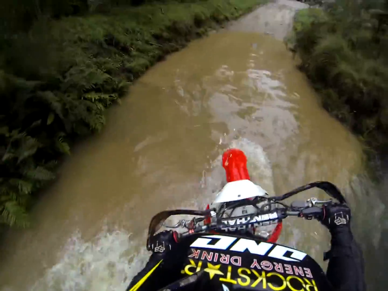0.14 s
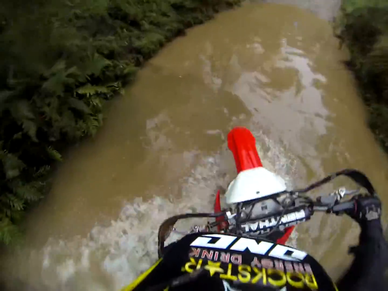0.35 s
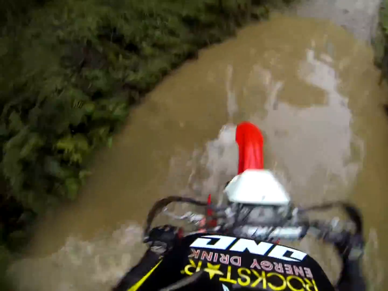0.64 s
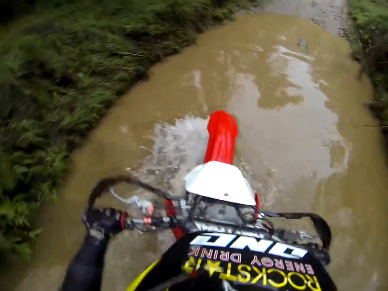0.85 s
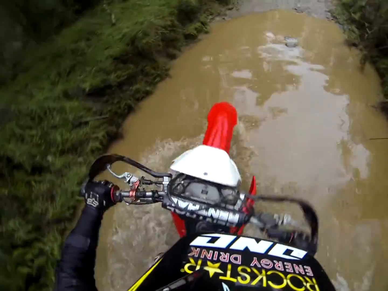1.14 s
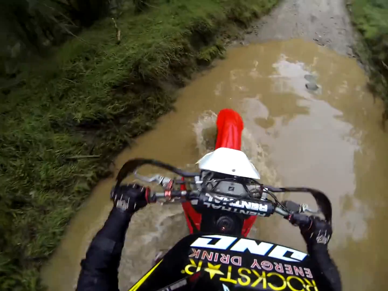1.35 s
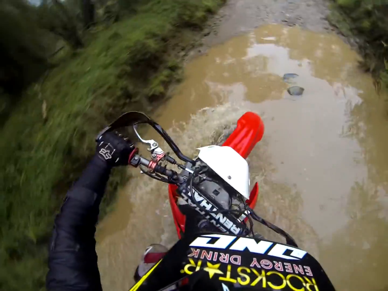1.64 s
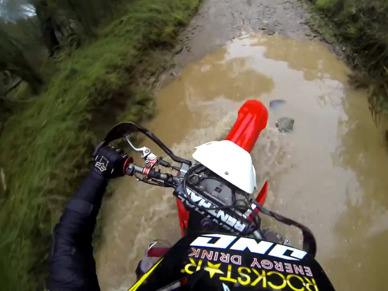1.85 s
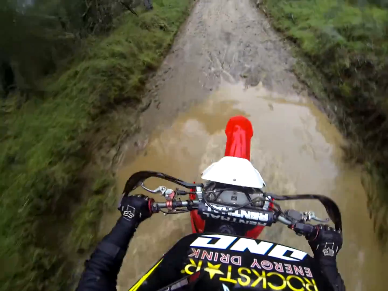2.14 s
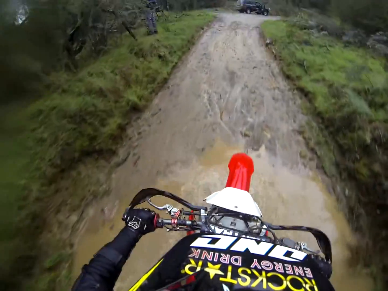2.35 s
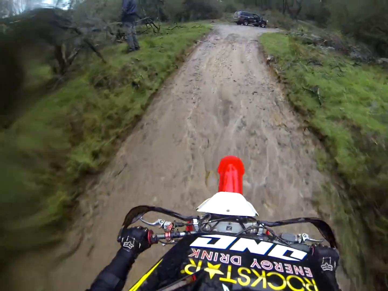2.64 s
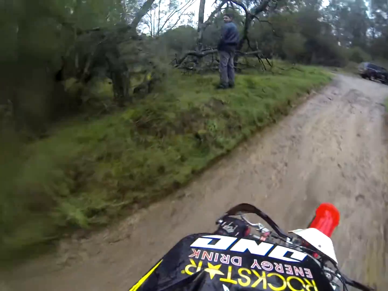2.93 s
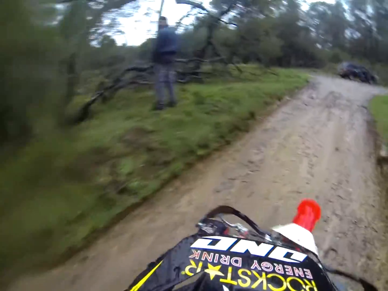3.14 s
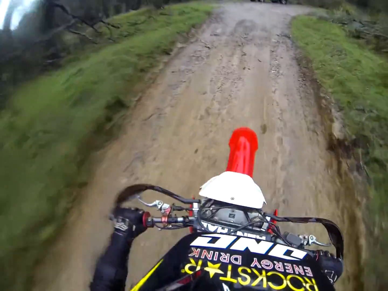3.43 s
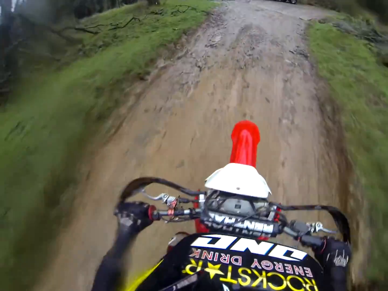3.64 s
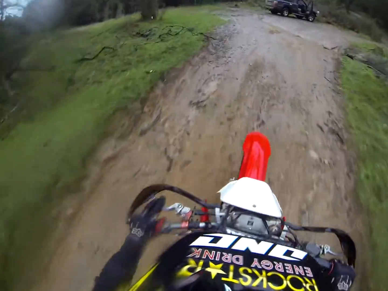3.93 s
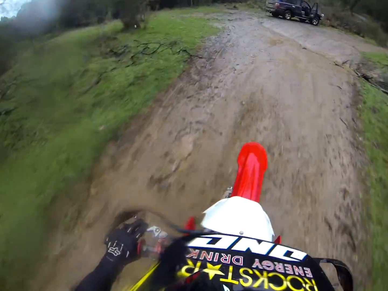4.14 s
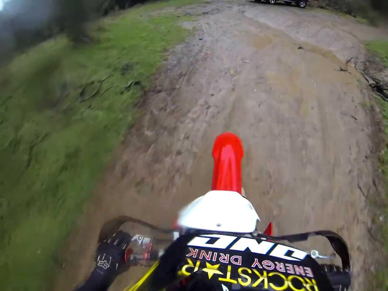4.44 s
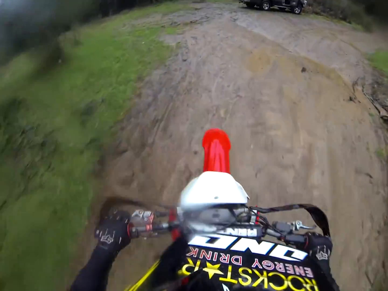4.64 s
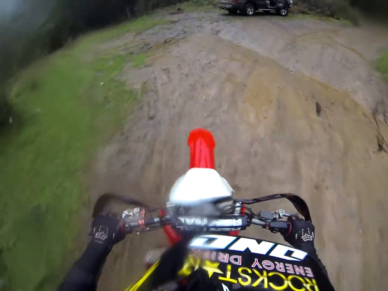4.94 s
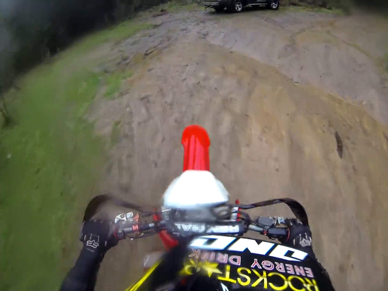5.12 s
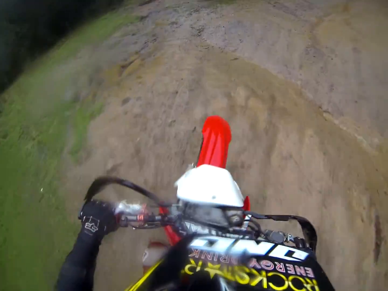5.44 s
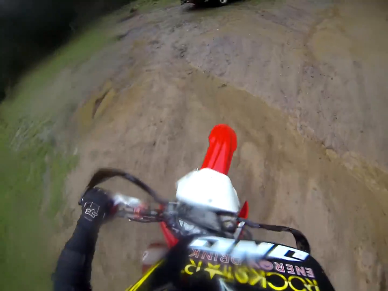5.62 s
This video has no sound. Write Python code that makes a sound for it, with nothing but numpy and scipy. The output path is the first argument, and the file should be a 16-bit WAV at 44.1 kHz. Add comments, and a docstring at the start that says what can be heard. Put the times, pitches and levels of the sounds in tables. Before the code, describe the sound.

A two-stroke dirt bike buzzes in throttle bursts through splashing water, then climbs out and coasts, popping and slowing on a dirt track.

```python
"""A two-stroke trail bike buzzes and splashes through a muddy ford, climbs out and coasts up a dirt track.
Its one cylinder fires in quick pulses that make the exhaust pipe drone, rasping with each burst of
throttle and popping unevenly when it is shut. Water sprays, the chain slaps, grit ticks and wet parts
sing. The microphone rides along in a plastic housing that rings with the engine's clatter.
Wind and thumps set off a very deep, wavering microphone rumble near 20 Hz."""
import sys
import numpy as np
from scipy import signal
from scipy.io import wavfile
from scipy.ndimage import uniform_filter1d

SR = 44100
rng = np.random.default_rng(int(sys.argv[2]) if len(sys.argv) > 2 else 0)


def persist_wave(psi):
    """Save psi, clipped to +-1, as 16-bit WAV."""
    counts = np.round(np.clip(psi, -1, 1) * 32767).astype(np.int16)
    wavfile.write(sys.argv[1], SR, np.atleast_2d(counts).T)


N = 254898
T = np.arange(N) / SR

# Deep water muffles the engine until it leaves the ford. Each row: time in seconds, gain in dB.
WATER_MUFFLING = [(0, -6.5), (.8, -8.5), (1.05, -4.5), (2.0, -1.5), (2.4, 0)]
# How the pipe rings after weak, stray firings. Each row: pitch in Hz, width in Hz, gain in dB.
PIPE_POP_MODES = [(104, 30.5, 10), (178, 34, -0.5), (223.8, 105, 2.5), (329.7, 50, 1), (560, 50, -19.5)]
# The low ringing of the plastic housing. Each row: pitch in Hz, width in Hz, gain in dB.
HOUSING_LOW_MODES = [(930, 660, -15), (1168, 54, -7.5), (1359.5, 182, 3), (1612, 222, 4)]
MUD_TO_DIRT_S = (3.4, 3.8)  # the tyres go from wet mud to gritty dirt between these times


def exhaust(rate, turns, middle_gain_db, high_gain_db):
    """Firings make a stack of tones at multiples of their rate (harmonics), shaped by the pipe."""
    # The ringing of pipe and silencer. Each row: pitch in Hz, width in Hz, gain in dB.
    pipe_modes = [(125.6, 45.7, 12), (235, 38, 8.5), (323, 81, 2.5), (469, 66, 3.5), (545.6, 32, 1),
                  (723.6, 34, -2.5), (945, 14, -17), (1030, 230, -13.5)]
    # The boom at twice the firing rate, strongest in the ford. Each row: time in seconds, level in dB.
    boom_levels = [(0, -36), (.48, -36), (.57, -45), (.72, -37), (.83, -38), (1.0, -20.5), (1.12, -20.7),
                   (1.24, -25.5), (1.57, -26), (1.67, -31.5), (1.8, -28.5), (2.0, -30), (2.23, -43),
                   (2.42, -28), (2.62, -33.5), (2.8, -45.5), (3.15, -30), (3.45, -41), (3.7, -33),
                   (4.05, -49), (4.47, -32), (4.8, -39), (5.78, -35)]
    # Loudness rules for harmonics 3-5 and 6-18; engine_db lists the four numbers.
    middle_rule = (-50.5, 6, 1.0, 1.6)
    high_rule = (-45.5, 17, 0.918, 0.53)
    grid_hz = np.arange(1, 2000)
    response = sum((-1) ** k * from_db(db) / (1 + 1j * (grid_hz ** 2 - hz ** 2) / (grid_hz * width))
                   for k, (hz, width, db) in enumerate(pipe_modes))
    pipe_phase = np.unwrap(np.angle(response))
    lowest, *others = [from_db(db) ** 2 / (1 + (2 * (grid_hz - hz) / width) ** 2)
                       for hz, width, db in pipe_modes]
    pipe_gain = np.sqrt(from_db(-8.5) ** 2 * lowest + sum(others)) ** 1.3  # the power sharpens the peaks
    speed = rate / rate.max()
    smear = speed ** 2  # fast pulses overlap their own echoes, slow ones stay distinct
    waves = []
    for k in range(1, 19):
        phase = 2 * np.pi * k * turns + np.interp(k * rate, grid_hz, pipe_phase)
        wave = np.cos(phase + smear * rng.standard_normal())
        waves.append(wave * np.interp(k * rate, grid_hz, pipe_gain) if k > 2 else wave)
    hum_db = -32.5 + 21 * np.log10(speed) + in_time(WATER_MUFFLING)  # slow pulses carry poorly
    hum = from_db(hum_db) * waves[0]
    boom = from_db(in_time(boom_levels) + 1.89 * drift(22)) * waves[1]
    middle = sum(wave * from_db(2.5 * drift(4.1)) for wave in waves[2:5])
    middle *= from_db(engine_db(middle_rule, rate, middle_gain_db))
    high = sum(wave * from_db(3.5 * drift(7.9)) for wave in waves[5:])
    high = from_db(engine_db(high_rule, rate, high_gain_db)) * evened(high, span_s=0.075)
    unevenness = from_db(1.53 * drift(38))
    return np.sqrt(2) * (hum + boom) + (np.sqrt(2) * middle + high) * unevenness


def rasp(rate, turns, effort_db):
    """Knocks, rushing gas and gear whine swell with each firing and set the housing ringing."""
    # The high ringing of the housing. Each row: pitch in Hz, width in Hz, gain in dB.
    housing_high_modes = [(1870, 85, -8.5), (2072, 218, 5.5), (2439, 185, 1), (2756, 430, -2.5),
                          (3240, 484, -1.5), (3764, 400, -0.5), (4670, 640, -12.5), (5230, 430, -12.5),
                          (5750, 1900, -22.5), (7500, 900, -21.5), (9700, 3160, -32), (13250, 2700, -42)]
    # Brief swells of clatter under load. Each row: time in seconds, gain in dB.
    surges = [(1.07, 6), (1.16, 0), (1.25, -1.5), (1.551, 11), (1.96, 5.5), (2.185, 4), (2.37, 5),
              (2.98, 3.5), (4.12, 3), (4.41, 2)]
    # Loudness rules for the low clatter and high sizzle; engine_db lists the four numbers.
    clatter_rule = (-37, 14, 0.8653, 1.45)
    sizzle_rule = (-43.5, 23.5, 1.0, 1.5)
    surge_db = sum(db * swell(s, half_s=0.038) for s, db in surges)
    clatter_db = engine_db(clatter_rule, rate, effort_db) + surge_db + 1.6 * drift(14.45)
    sizzle_db = engine_db(sizzle_rule, rate, effort_db) + 0.51 * surge_db
    throb = from_db(1.5 * np.cos(2 * np.pi * turns))
    knocks = engine_knocks(turns)
    gas = rng.standard_normal(N)
    gear_phase = 2 * np.pi * 35.5 * turns  # teeth meet 35.5 times a turn, so the whine follows the speed
    whine = from_db(-27 + 3.9 * drift(10)) * np.sin(gear_phase + 1.3 * drift(35))
    clatter = evened(resonate(throb * (knocks + .5 * gas + whine), HOUSING_LOW_MODES), span_s=0.12)
    sizzle = evened(resonate(throb * (knocks + 1.9 * gas + whine), housing_high_modes), span_s=0.083)
    return from_db(clatter_db) * clatter + from_db(sizzle_db) * sizzle


def engine_knocks(turns, per_turn=14, slop_turns=.0035, scatter_db=2.5):
    """Piston, gears and pipe wall knock at the same points of each turn, never quite alike."""
    out, count = np.zeros(N), int(turns[-1]) - 1
    for angle in (np.arange(per_turn) + rng.random(per_turn)) / per_turn:
        at = crank_passes(turns, angle + slop_turns * rng.standard_normal(count))
        out += clicks_at(at, rng.choice([-1, 1]) * from_db(scatter_db * rng.standard_normal(count)))
    return rms_one(out)


def throttle(snap_s=0.058, pick_up_s=0.097):
    """Three gains in dB that rise with each twist; snapping shut makes the engine briefly fall quiet."""
    # Twists of the throttle. Each row: start, time taken to open, start of closing and time taken to
    # close, all in seconds, then gains in dB for the rasp, middle harmonics and high harmonics.
    twists = [(-.03, 0.18, 0.14, .016, 10.5, -1, 7), (.19, 0.27, 0.497, 0.037, 13, 3.5, 11),
              (.58, 0.23, 0.734, 0.067, 12.5, -9, 5), (0.809, 0.17, 1.49, 0.1, 13, 10, 7),
              (1.6, 0.29, 2.148, 0.3, 10.5, 7, 10), (2.21, 0.23, 2.665, .03, 12.5, 11, 10.3),
              (2.8, 0.27, 3.552, 0.33, 7, 3.5, 11.5), (4.25, .15, 4.73, 0.087, 2.5, 6, 6)]
    gains_db, dip_db = np.zeros((3, N)), np.zeros(N)
    for opens, opening_s, shuts, closing_s, *full_db in twists:
        opened = np.sin(np.pi / 2 * np.clip((T - opens) / opening_s, 0, 1))
        closed = np.clip((T - shuts) / closing_s, 0, 1)
        gains_db = np.maximum(gains_db, np.outer(full_db, opened * (1 - closed)))
        dip_db += 7 * closed * np.exp(-closing_s / snap_s - np.maximum(T - shuts, 0) / pick_up_s)
    return gains_db - dip_db


def engine_db(rule, rate, throttle_db):
    """An engine sound grows with speed and throttle and is muffled by deep water."""
    # A rule holds: level in dB at 55 firings a second, dB added at ten times that speed,
    # how much the throttle counts, how much the muffling counts.
    base_db, speed_db, throttle_weight, water_weight = rule
    level_db = base_db + speed_db * np.log10(rate / 55) + throttle_weight * throttle_db
    return level_db + water_weight * in_time(WATER_MUFFLING)


def intake_gulps(fade_s=0.04):
    """As the throttle snaps shut, the air in the intake is stopped short and swings on briefly."""
    # The gulps. Each row: start in seconds, starting level in dB, pitch in Hz.
    gulps = [(0.109, -15.5, 95), (.137, -6.5, 70), (0.427, -16, 89.5), (0.49, -9, 65), (0.516, -13, 55.4),
             (0.729, -11, 60), (.752, -17, 50), (1.6, -15, 45), (2.203, -7, 50), (2.64, -16, 75.95),
             (2.669, -6, 54.52)]
    out = np.zeros(N)
    for s, db, hz in gulps:
        age = np.maximum(T - s, 0)
        out += from_db(db - 60 * np.minimum(age / fade_s, 3)) * np.sin(2 * np.pi * hz * age)
    return out


def burble(turns, scatter_db=0.5, puff_s=0.0085):
    """Each firing is stronger or weaker than the average one and comes with a short puff of gas."""
    # Uneven burning, strongest when coasting. Each row: time in seconds, relative level in dB.
    uneven_levels = [(0, -45), (.44, -51), (.58, -56), (.85, -54), (1.05, -38.5), (2.0, -41), (2.75, -72),
                     (3.4, -36.5), (3.7, -31.5), (4.37, -35), (4.6, -44), (5.05, -36.5), (5.35, -47.5),
                     (5.78, -54)]
    count = int(turns[-1]) - 1
    at = crank_passes(turns, rng.uniform(0, 0.299, count))
    kicks = clicks_at(at, from_db(-scatter_db * rng.standard_normal(count)) * rng.choice([-1, 1], count))
    puffs = signal.lfilter([1], [1, -np.exp(-1 / (puff_s * SR))], kicks) * rng.standard_normal(N)
    ringing = resonate(rms_one(kicks) + 0.47 * rms_one(puffs), PIPE_POP_MODES)
    return from_db(in_time(uneven_levels) - 1.8) * evened(ringing, span_s=0.28)


def exhaust_pops():
    """Stray firings pop in the pipe as the throttle shuts and while the bike coasts."""
    # The pops. Each row: time in seconds, relative peak level in dB.
    pops = [(.122, -32), (.143, -27.5), (.43, -31), (2.0, -22.5), (2.66, -27), (3.66, -30), (3.78, -24),
            (4.874, -39), (4.952, -29), (5.026, -23), (5.074, -27), (5.112, -26), (5.155, -25),
            (5.198, -27), (5.264, -28.5), (5.305, -35), (5.373, -34), (5.435, -33), (5.5, -29), (5.56, -30),
            (5.663, -31), (5.735, -26)]
    return blows(pops, PIPE_POP_MODES, gain_db=-1.5, lead_s=0.00426)


def splashing(effort_db, drops_per_s=4000):
    """Drops patter on the bike in surges and trapped bubbles ring; more throttle makes both louder."""
    # Water pushed aside by the wheels, throttle shut. Each row: time in seconds, relative level in dB.
    splash_levels = [(0, -48.5), (.8, -51), (1.02, -42.5), (2.0, -37), (2.25, -62), (2.75, -58), (3.6, -75),
                     (5.78, -76)]
    # Mudguard and engine cases ringing under the spray. Each row: pitch in Hz, width in Hz, gain in dB.
    spray_modes = [(635, 53, 2.5), (975, 170, -15), (1460, 400, 3.5), (2210, 170, -0.5), (2486, 190, 0),
                   (3720, 580, -5.5), (4750, 490, -16.5), (6960, 4600, -33), (12700, 1100, -39)]
    surge = from_db(4.5 * drift(22))
    sizes = from_db(3 * np.minimum(rng.exponential(1, N), 4)) * rng.choice([-1, 1], N)
    drops = sizes * (rng.random(N) < drops_per_s * surge / SR)
    spray = rms_one(resonate(drops, spray_modes))
    bubble_hz = np.geomspace(380, 2600, num=16)
    choice = rng.integers(0, len(bubble_hz), N)  # each drop gets one bubble pitch
    bubbles = rms_one(sum(band(drops * (choice == k), hz * 15 / 16, hz * 16 / 15) / np.sqrt(hz)
                          for k, hz in enumerate(bubble_hz)))
    level_db = in_time(splash_levels) + 0.76 * effort_db
    return from_db(level_db) * (from_db(-0.5) * spray + from_db(-11.5) * bubbles)


def chain_slaps():
    """The chain slaps its guide, and the housing rings with each knock."""
    # The slaps. Each row: time in seconds, relative peak level in dB.
    slaps = [(4.019, -32), (4.0386, -33), (4.228, -21.5), (4.4074, -18), (4.4715, -28), (4.823, -21),
             (5.255, -26), (5.3644, -33), (5.3972, -32)]
    return blows(slaps, HOUSING_LOW_MODES, gain_db=-2.0, lead_s=0.001052)


def grit(grains_per_s=8):
    """Small stones and wet dirt tick against the plastics; finer grains follow at random on the track."""
    # The largest pieces. Each row: time in seconds, relative peak level in dB.
    stones = [(0.1271, -44), (0.4994, -45), (0.7344, -46), (3.2999, -41), (3.489, -42), (3.7391, -42),
              (3.9165, -45), (4.314, -49), (4.8224, -49), (4.8572, -39.5), (5.048, -48.5), (5.099, -50),
              (5.4774, -49)]
    # The ring of each tick. Each row: pitch in Hz, width in Hz, gain in dB.
    tick_modes = [(4760, 260, 11), (6060, 470, 2), (8400, 2000, -7.5), (11900, 4100, -23)]
    hits = rng.random(N) < grains_per_s * on_track() / SR
    grains = hits * from_db(-50 + 3 * rng.uniform(-1, 1, N))
    return blows(stones, tick_modes, gain_db=3.0) + struck(grains, tick_modes)


def brake_disc():
    """The wet disc sings thinly against its pads; each touch swells and fades."""
    # Each row is a touch: loudest moment and half length in seconds, pitch in Hz, relative level in dB.
    touches = [(.08, 0.13, 7470, -69), (0.4, .14, 7500, -61), (1.35, .1, 7750, -58.5),
               (3.348, 0.29, 7500, -57)]
    return sum(singing(hz, db + 1.5, width_hz=160) * swell(s, half_s) for s, half_s, hz, db in touches)


def drive_squeal():
    """The wet drive gives one short squeal that sinks in pitch."""
    # The squeal's path. Each row: time in seconds, pitch in Hz, relative level in dB.
    squeal_path = [(4.41, 3983, -90), (4.445, 3940, -49), (4.47, 3814, -58), (4.53, 3710, -53),
                   (4.58, 3720, -58), (4.63, 3700, -85)]
    s, hz, db = np.transpose(squeal_path)
    return singing(np.interp(T, s, hz), np.interp(T, s, db) + 7, width_hz=74)


def tyres():
    """Tyres rustle over the ground; out on the track a thin, high whistle comes with them."""
    rustle = rms_one(band(rng.standard_normal(N), 360, 1030))
    whistle = rms_one(band(rng.standard_normal(N), 10050, 10500))
    return from_db(-54.5) * rustle + from_db(-80) * whistle * on_track()


def microphone_rumble(rise_s=0.06, decay_s=0.097):
    """Wind and thumps set off a very deep, wavering microphone rumble near 20 Hz."""
    # Swells of the rumble. Each row: loudest moment in seconds, relative level in dB.
    thumps = [(.14, -9.5), (.34, -13.5), (.51, -9), (.75, -11.5), (1.171, -12), (1.48, -12), (1.6, -10.5),
              (1.8, -12.5), (2.03, -10.5), (2.21, -10.5), (2.68, -10), (2.86, -13.5), (3.3, -15),
              (3.66, -12), (3.98, -11), (4.1, -15.5), (4.56, -11), (4.77, -13), (5.13, -12.5),
              (5.44, -10.5)]
    bursts = [from_db(db) * np.exp(-np.maximum((s - T) / rise_s, (T - s) / decay_s).clip(0, 20))
              for s, db in thumps]
    strength = np.sqrt(from_db(-21.5) ** 2 + sum(burst ** 2 for burst in bursts))  # never quite silent
    tone_hz = 20.66 * (1 + 0.216 * drift(12.12))
    tone = np.sqrt(2) * np.sin(2 * np.pi * np.cumsum(tone_hz) / SR)
    low_noise = evened(band(rng.standard_normal(N), 21.6, 76), span_s=0.026)
    return strength * (from_db(-3) * tone + from_db(-25.5) * low_noise)


def singing(hz, db, width_hz):
    """Rubbing keeps a thin tone going, unsteady in strength and phase."""
    phase = 2 * np.pi * np.cumsum(hz * np.ones(N)) / SR
    return from_db(db) * (drift(width_hz) * np.cos(phase) + drift(width_hz) * np.sin(phase))


def blows(events, modes, gain_db, lead_s=0):
    """Strike the modes once for each event, lead_s seconds ahead of its time."""
    s, db = np.transpose(events)
    return struck(clicks_at((s - lead_s) * SR, from_db(db + gain_db)), modes)


def struck(clicks, modes):
    """Ringing scaled so that a lone click peaks at its own size."""
    return resonate(clicks, modes) / np.abs(resonate(signal.unit_impulse(4096), modes)).max()


def resonate(x, modes):
    """Ring an object's modes (the pitches it favours), added with alternating signs."""
    return sum((-1) ** k * from_db(db) * band(x, hz - width / 2, hz + width / 2)
               for k, (hz, width, db) in enumerate(modes))


def band(x, low_hz, high_hz):
    """Keep the sound between two frequencies."""
    edges = np.clip([low_hz, high_hz], 8, .45 * SR)
    return signal.sosfilt(signal.butter(2, edges, "band", fs=SR, output="sos"), x + 1e-18)


def clicks_at(at, sizes):
    """Clicks at the given sample positions."""
    return np.bincount(np.clip(np.round(at), 0, N - 1).astype(int), sizes, N)


def crank_passes(turns, angle):
    """Sample positions at which the engine's shaft passes an angle, given in turns."""
    return np.interp(np.arange(int(turns[-1]) - 1) + angle, turns, np.arange(N))


def drift(hz):
    """A smooth random wobble of typical size 1; more Hz makes it quicker."""
    step = 40  # samples between random values
    pole = np.exp(-2 * np.pi * hz * step / SR)
    slow = signal.lfilter([1], [1, -2 * pole, pole ** 2], rng.standard_normal(N // step + 2002))[2000:]
    return np.interp(np.arange(N) / step, np.arange(len(slow)), rms_one(slow))


def evened(x, span_s):
    """Hold the running average level near 1."""
    size = int(span_s * SR)
    power = uniform_filter1d(uniform_filter1d(x ** 2, size), size).clip(0)
    return x / np.sqrt(power + 1e-3 * np.mean(x ** 2))


def swell(peak_s, half_s):
    """A rounded rise to 1 and fall back."""
    return np.exp(-np.minimum(((T - peak_s) / half_s) ** 2, 20))


def on_track():
    """0 in the mud, rising to 1 on the dirt track."""
    return np.interp(T, MUD_TO_DIRT_S, [0, 1])


def in_time(rows):
    """Join rows of time and value with straight lines."""
    return np.interp(T, *np.transpose(rows))


def rms_one(x):
    """Scale to an average level (rms) of 1."""
    return x / np.sqrt(np.mean(x ** 2) + 1e-20)


def from_db(db):
    """Decibels to gain."""
    return 10 ** (np.asarray(db) / 20)


def scene():
    """Speed and throttle drive the engine; the bike's rattles, water, tyres and rumble join it."""
    # Engine speed, one firing to each turn. Each row: time in seconds, firings per second.
    engine_speeds = [(0, 50), (.13, 51.7), (.29, 51.8), (.42, 59.6), (.5, 51.6), (.67, 60), (.85, 61),
                     (.93, 69), (1.0, 65.3), (1.1, 65.4), (1.21, 69), (1.3, 62), (1.45, 61.2), (1.71, 67.8),
                     (2.0, 65.2), (2.17, 70), (2.25, 70.6), (2.46, 78.3), (2.54, 79.6), (2.61, 73.5),
                     (2.72, 63.2), (2.88, 51.6), (3.0, 53), (3.16, 58.3), (3.27, 60.4), (3.48, 63.5),
                     (3.57, 61.2), (3.79, 49.4), (3.92, 51.4), (4.06, 47.8), (4.26, 39.2), (4.43, 54.2),
                     (4.52, 48.4), (4.59, 46.3), (4.71, 47.3), (4.89, 39.5), (5.08, 37.6), (5.33, 33),
                     (5.78, 25.4)]
    rate = in_time(engine_speeds)
    turns = np.cumsum(rate * (1 + .0018 * drift(25))) / SR
    effort_db, middle_gain_db, high_gain_db = throttle()
    engine = exhaust(rate, turns, middle_gain_db, high_gain_db) + intake_gulps()
    engine += burble(turns) + exhaust_pops() + rasp(rate, turns, effort_db)
    chassis = chain_slaps() + grit() + brake_disc() + drive_squeal()
    return (engine + chassis + splashing(effort_db) + tyres() + microphone_rumble())[None]


def record(dry):
    """Cut the highest treble, above 15200 Hz."""
    return signal.sosfilt(signal.ellip(10, .1, 80, 15200, fs=SR, output="sos"), dry)


dry = scene()
out = record(dry)
persist_wave(out)
```